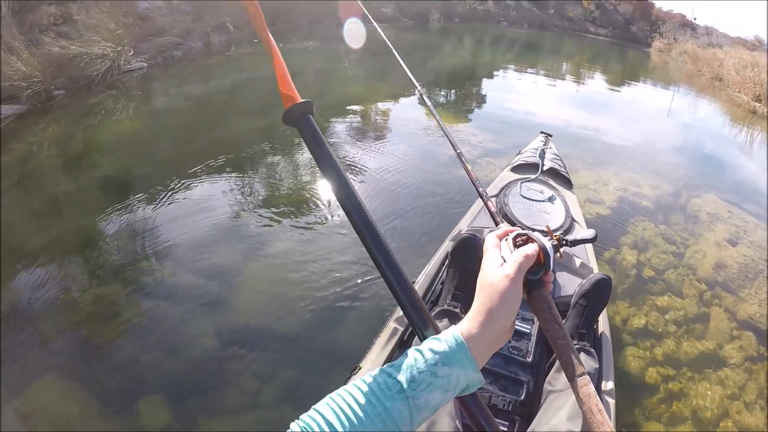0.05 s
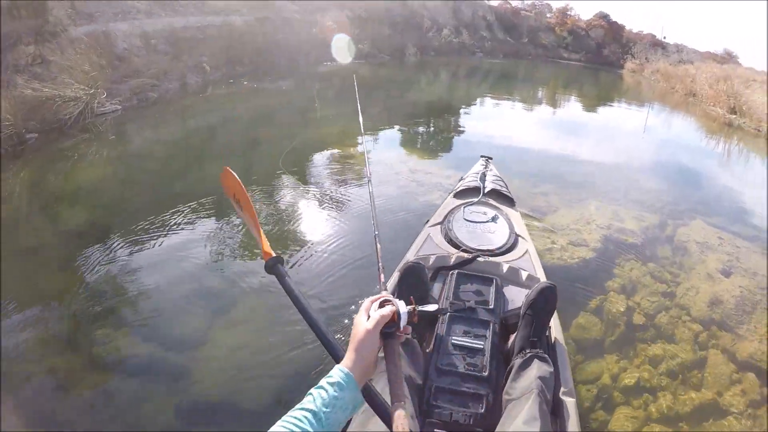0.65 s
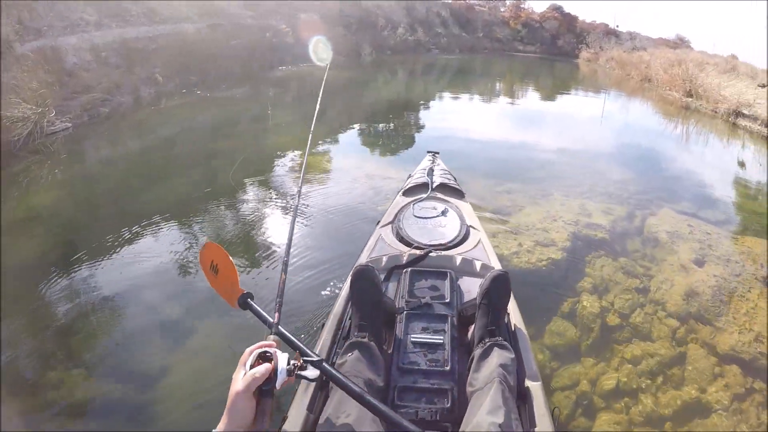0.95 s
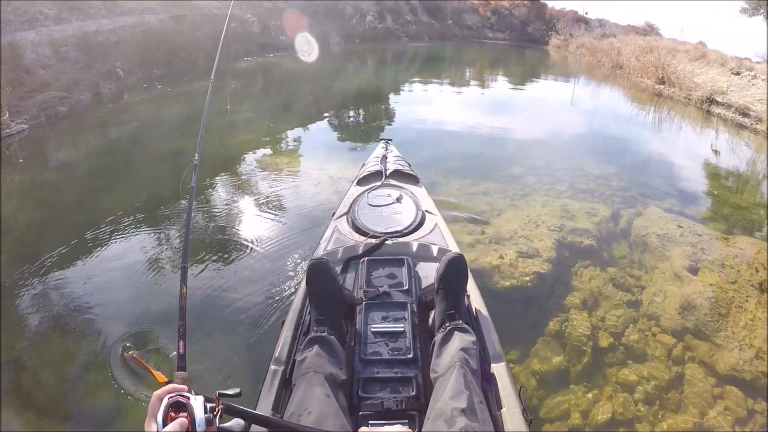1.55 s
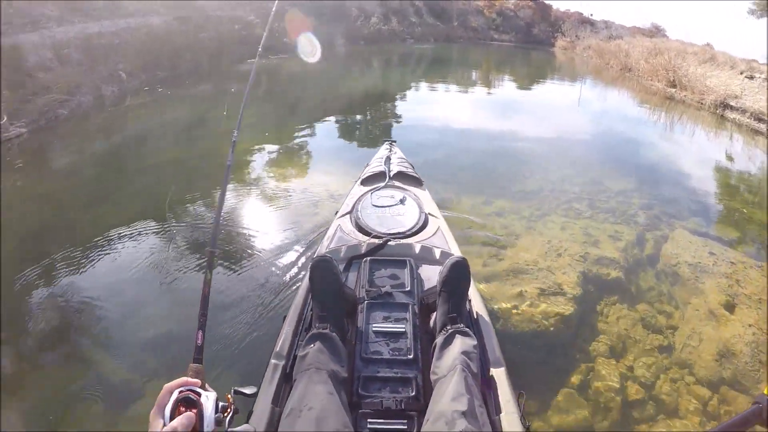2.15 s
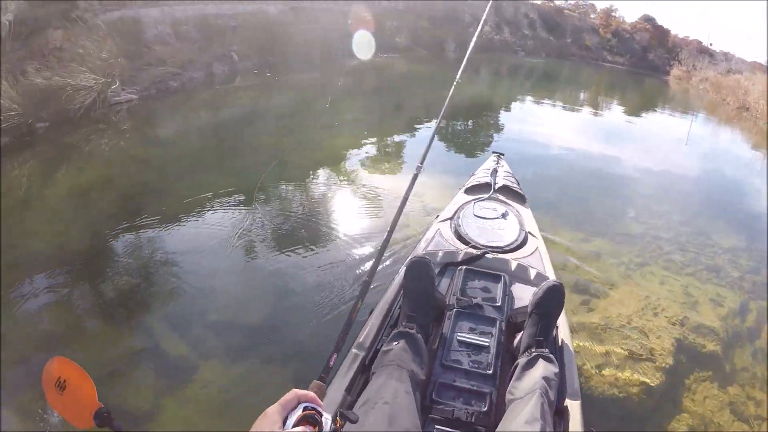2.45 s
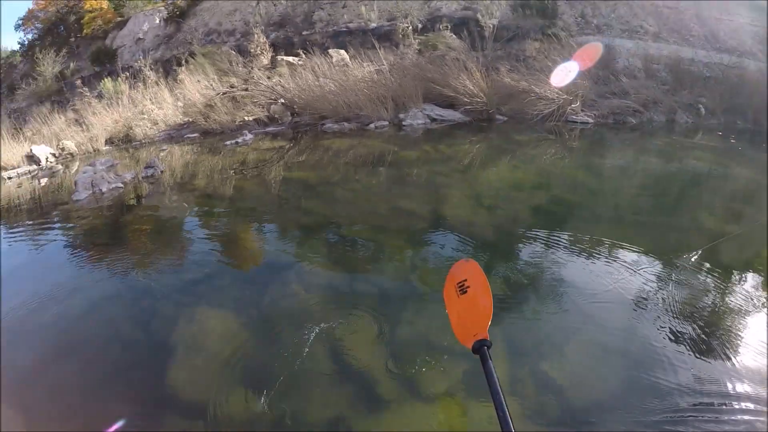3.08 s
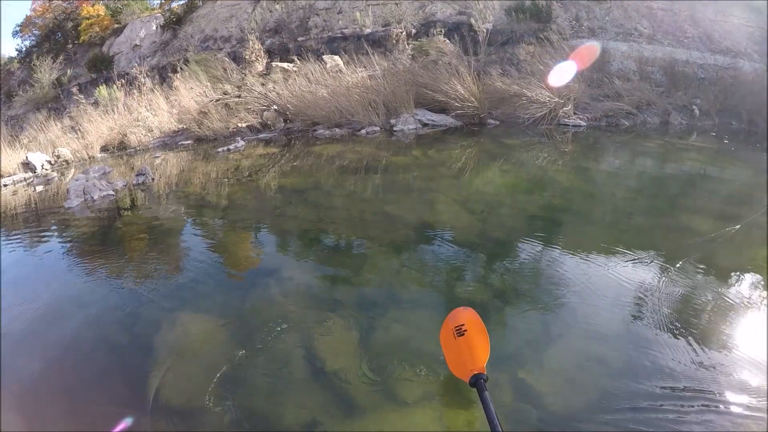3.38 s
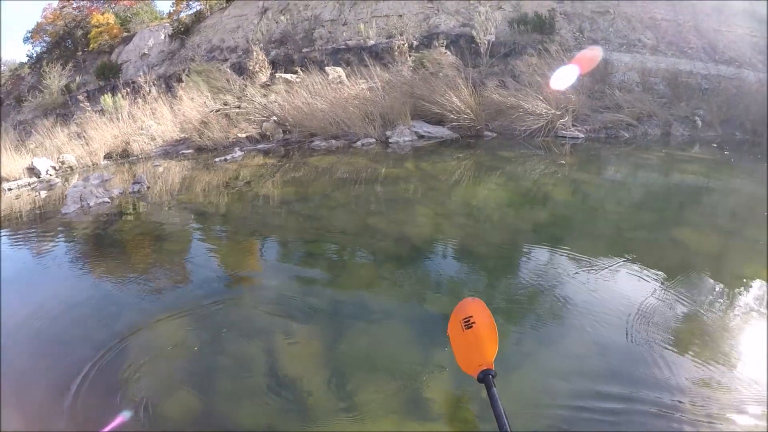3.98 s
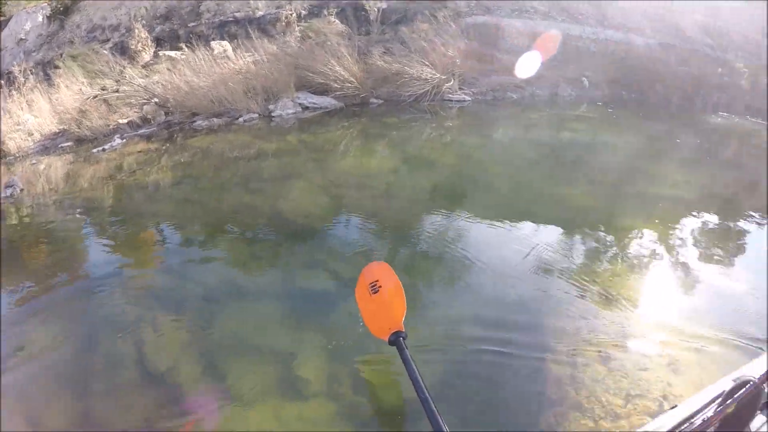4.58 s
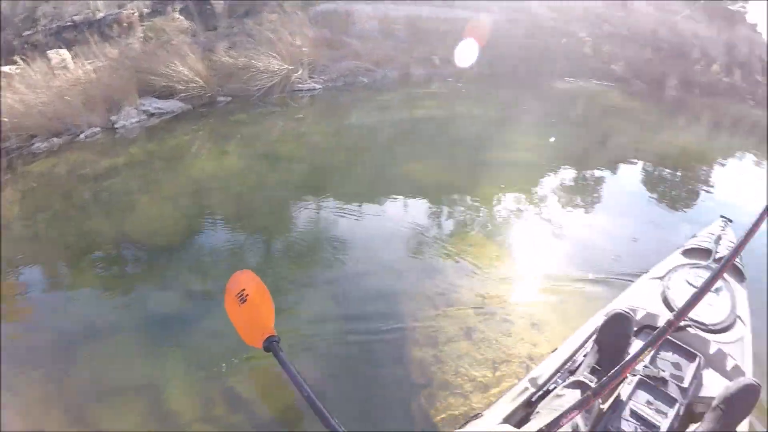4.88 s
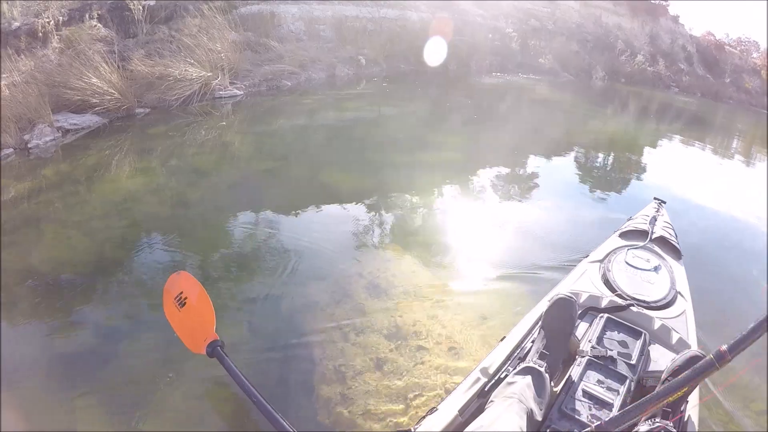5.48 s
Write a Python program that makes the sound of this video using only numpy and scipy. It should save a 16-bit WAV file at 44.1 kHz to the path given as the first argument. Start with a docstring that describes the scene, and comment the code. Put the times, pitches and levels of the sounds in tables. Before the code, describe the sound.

Close to a body-worn microphone on a quiet river, water gurgles softly around a paddle blade in two easy strokes, with drips between them and tiny ticks from a rod and line. Just after the second stroke a fishing reel engages with a single loud, sharp clack and a low puff of air passes. Then come faint cloth rustling and three light, hollow knocks on the kayak, over a soft breeze and faint hiss.

```python
"""A paddle makes two gentle strokes in a calm river: its blade splashes, folds under air pockets that
resonate as bubbles, and drips. An angler's tackle ticks, and the reel snaps into gear with one sharp
clack, an impact that excites the modes of frame and rod. A sleeve rustles by friction and gear bumps
the hollow plastic kayak. A light breeze, a faint whirr and a thin hiss lie underneath.
All is heard at the two microphone ports of a camera worn on the body."""
import sys
import numpy as np
from scipy import signal
from scipy.fft import rfft, irfft, next_fast_len
from scipy.io import wavfile
from scipy.ndimage import map_coordinates

SR = 44100
rng = np.random.default_rng(int(sys.argv[2]) if len(sys.argv) > 2 else 0)


def persist_wave(psi):
    """Save psi, clipped to +-1, as 16-bit WAV."""
    counts = np.round(np.clip(psi, -1, 1) * 32767).astype(np.int16)
    wavfile.write(sys.argv[1], SR, np.atleast_2d(counts).T)


N = 243873
TOP_HZ = 15300

# Levels are relative; pan is left minus right; t60 is the time to decay by 60 dB.
# stereo width, as side over mid: f/Hz, level/dB
WIDTH = [(100, 3), (200, 0.5), (380, 2), (700, 7.5), (1300, 5.5), (2400, -1.5), (4400, -3.5), (8000, 2.5),
         (15000, -1.5)]
# spectrum of breeze and distant water: f/Hz, level/dB
BREEZE_SPECTRUM = [(25, -21.5), (90, -27.5), (115, -23.5), (150, 1.5), (200, 0.5), (300, -4), (500, -10),
                   (1000, -16), (2000, -20), (4000, -25), (8000, -43.5)]
# spectrum of the hiss: f/Hz, level/dB
HISS_SPECTRUM = [(500, -41.5), (2000, -4), (4300, -5), (5800, 4.5), (7700, 4), (8600, 2.5), (10300, 1.5),
                 (11300, -4.5), (15000, -14)]
# water surging round blade and hull: crest t/s, level/dB, rise/s, fall/s, pan/dB
SURGES = [(0.08, -47, 0.11, 0.86, -5.5), (0.62, -39, 0.34, 0.23, -8), (1.4, -50.5, 0.43, 1, -3.5),
          (2.35, -43, 0.44, 0.27, 1), (3.1, -44, 0.12, 0.12, -4), (4.1, -55, 0.81, 3.5, -1)]
# spectrum of churned water: f/Hz, level/dB
WASH_SPECTRUM = [(150, -59), (280, 3.5), (430, 3), (700, -2.5), (1300, 1), (2000, -14.5), (3000, -10.5),
                 (6000, -33), (12000, -50)]
# contacts of line, reel and rod, plus two drops off the blade (0.0465 s, 0.9563 s) sounding as ticks: t/s,
# level/dB, f/Hz, pan/dB, snap over ring/dB
TICKS = [(0.0128, -37, 3670, -13, -5), (0.0465, -36.5, 2900, -15, -7), (0.0652, -38, 6130, -12, -5),
         (0.082, -35, 7500, -5, -0.5), (0.634, -34, 6300, -16, -10), (0.6448, -31.5, 7700, -10, -6),
         (0.8225, -45.5, 3870, -16, 8.5), (0.8265, -40, 7800, -10, 1), (0.8508, -43, 7500, -7, -1),
         (0.8647, -37, 7040, -11, 0.5), (0.8925, -30.5, 7200, -13, -2), (0.896, -30, 7600, -9, -10),
         (0.9367, -35.5, 8050, -9, -9), (0.9563, -35.5, 2750, -11, -1), (1.329, -46, 4020, 0, -6),
         (2.5577, -32, 6300, 4, -9), (2.587, -21.5, 7100, 3, -15), (2.5901, -36, 7500, 3, -12),
         (2.736, -30.5, 6600, 0, -3), (2.776, -30.5, 7400, 0, -10), (2.8905, -37, 3380, 0, 0),
         (3.0615, -31, 7100, 0, -10), (3.108, -32.5, 6800, 1, -8), (3.5595, -35, 6600, -3, -6),
         (4.2566, -37.5, 6900, 0, -14), (4.2825, -41, 4500, -1, 2), (5.334, -38.5, 7050, -11, -7)]
# spectrum of a tick's snap: f/Hz, level/dB
SNAP_SPECTRUM = [(1000, -8), (3000, 0), (7000, 3), (10000, 0), (15000, -13)]
# spectrum of the deck's echo: f/Hz, level/dB
ECHO_SPECTRUM = [(150, -33), (550, 3), (2000, -2), (3200, 1), (5800, -2.5), (7200, -3.5), (9000, -9),
                 (14000, -27)]
# the largest air pockets: t/s, level/dB, f/Hz, pan/dB, ringing/cycles
AIR_POCKETS = [(0.07, -30, 1120, -9, 9.3), (0.278, -35, 492, -1, 13), (0.304, -31, 1500, -10, 30),
               (0.3132, -28, 1150, -9, 11), (0.317, -31, 1430, -8, 55), (0.324, -34, 1250, -8, 16),
               (0.33, -31, 1027, -8.5, 21), (0.407, -35, 407, 6, 26), (0.428, -41, 372, 5, 36),
               (0.465, -46, 365, 3, 24), (0.541, -36, 388, 0, 27), (0.558, -33, 470, -3, 32),
               (0.568, -40, 900, -6, 27), (0.599, -40, 918, -6, 70), (0.583, -32.5, 426, 7, 17),
               (0.5915, -26, 531, -6, 16), (0.633, -25.5, 1900, -9, 17), (0.643, -28, 1880, -8, 48),
               (0.655, -35, 950, -6, 20), (0.669, -36.5, 435, 1, 39), (0.684, -35.5, 409, 7, 42),
               (0.703, -36.5, 604, -4, 19), (0.747, -37, 704, -8, 10), (0.762, -33, 575, 0, 22),
               (0.822, -41.5, 392, 6, 24), (0.851, -45, 1090, -5, 22), (0.876, -38, 1540, -6, 41),
               (0.894, -43, 923, -5, 12), (0.912, -45.5, 663, -3.5, 98), (1.031, -44.5, 359, 0, 20),
               (1.325, -40.5, 397, -1, 7.5), (1.356, -42, 506, 4, 12), (1.385, -45, 953, -7, 16),
               (1.73, -40.5, 692, 0, 8.2), (1.783, -43, 476, -2, 11), (2.14, -42, 367, 2, 34),
               (2.269, -34.5, 432, 3, 47), (2.283, -37, 774, 2, 16), (2.297, -35, 390, 6, 19),
               (2.309, -38, 1350, 11, 19), (2.335, -39, 840, 5, 18), (2.375, -36.5, 1000, 4, 24),
               (2.411, -40.5, 630, -4, 12), (2.451, -42, 680, 0, 12), (2.488, -34, 1260, 10, 16),
               (2.548, -39, 1370, 0, 26), (2.561, -39.5, 1780, 5, 28), (2.585, -44, 1127, 1, 80),
               (2.652, -35.5, 670, -2, 8), (2.684, -40, 1250, 4, 28), (2.73, -40.5, 613, 4, 27),
               (2.767, -34, 1740, 8, 20), (2.775, -38, 1500, 3, 26), (2.822, -41, 1090, 6, 34),
               (2.904, -31.5, 1520, 0, 27), (3.115, -35.5, 1070, -20, 10)]
# the blade enters, turns or lifts out: t/s, level/dB, f/Hz, swell/s, t60/s, pan/dB
SPLASHES = [(0.258, -40.5, 1760, 0.0057, 0.13, -11), (0.284, -32, 1100, 0.025, 0.21, -10),
            (0.312, -35.5, 1250, 0.012, 0.1, -9), (0.484, -44, 1300, .003, 0.092, -10),
            (0.643, -34, 2100, .0014, 0.051, -5), (0.755, -42.5, 900, 0.0055, 0.15, -6),
            (0.821, -35.5, 1310, .002, 0.057, -9), (2.13, -42, 1000, 0.0078, .16, -1),
            (2.268, -38, 750, .007, 0.21, 4), (2.445, -40, 1010, .005, 0.2, 3),
            (2.474, -36, 1260, 0.0083, 0.16, 2), (2.729, -27.5, 1090, .001, 0.023, 10),
            (2.812, -43.5, 1450, 0.0036, 0.12, 10)]
# arm moves that rub the sleeve: crest t/s, level/dB, rise/s, fall/s
ARM_MOVES = [(0.52, -51.5, 0.18, 0.45), (0.93, -53.5, 0.25, 0.067), (2.5, -55.5, 0.6, 0.56),
             (2.85, -49.5, 0.18, 0.28), (3.0, -45.5, 0.016, 0.11), (3.23, -45.5, 0.018, 0.035),
             (3.34, -47, 0.024, 0.039), (3.52, -58.5, 0.12, 0.78), (3.97, -48.5, 0.044, 0.11),
             (4.06, -46.5, 0.016, 0.089), (4.6, -50.5, 0.25, 0.34)]
# spectrum of sliding cloth: f/Hz, level/dB
CLOTH_SPECTRUM = [(200, -14), (500, -0.5), (1200, -3.5), (2500, -1.5), (4200, -1), (6000, 1.5), (7600, 3),
                  (8600, -4.5), (11000, -12), (15000, -25)]
# swell of the whirr: crest t/s, level/dB, rise/s, fall/s
WHIRR_SWELL = (1.1, -56, 0.5, 0.8)
# resonances of the whirr: f/Hz, width/Hz, level/dB
WHIRR_PEAKS = [(924, 53, -4), (1137, 63, -4.5)]
# drops off the raised blade: t/s, level/dB, f/Hz, pan/dB
DRIPS = [(1.434, -41, 3200, -1), (1.5515, -40, 4430, 11), (1.604, -45, 2450, 5), (1.667, -38.5, 2400, 3),
         (1.731, -36, 3160, 2), (1.76, -42, 2800, 6), (1.771, -39, 2050, 6), (1.803, -42, 2470, 0.5),
         (1.875, -29.5, 1330, -20), (1.9663, -34.5, 1560, -11), (2.0767, -33.5, 1790, -9),
         (2.364, -40, 2150, 6), (2.7, -40, 1900, 6)]
# spectrum of a drop's slap: f/Hz, level/dB
SLAP_SPECTRUM = [(300, -14), (1000, -3), (2300, 3), (4000, -7), (7000, -9), (13000, -26)]
# air across the ports as the body turns: crest t/s, level/dB, rise/s, fall/s
GUST = (3, -48, 0.65, 0.35)
# the clutch strikes and rebounds: t/s, level/dB
CLUTCH_STRIKES = [(2.928, 11), (2.9303, -5)]
# modes of the reel's frame: f/Hz, level/dB, t60/s, pan/dB
FRAME_MODES = [(4010, -18.5, 0.0075, -2), (4980, -13.5, 0.006, -6), (5830, -3.5, 0.0044, 3),
               (7140, -4, 0.0035, 8), (8130, -17, .005, 10), (8700, -21, 0.009, -2),
               (10240, -21.5, 0.0073, 9), (10860, -20.5, 0.0067, 5), (12630, -15.5, 0.0028, 11)]
# ping of the clutch spring: f/Hz, level/dB, t60/s
SPRING_MODE = (8265, -38, .085)
# modes of rod and grip: f/Hz, level/dB, t60/s
ROD_MODES = [(530, -29.5, 0.015), (693, -18, 0.01), (1010, -19, 0.0071), (1240, -16.5, 0.0076),
             (1580, -18.5, 0.01), (1844, -20.5, 0.01), (2200, -44, 0.0058), (2850, -24.5, 0.0099)]
# the grip thuds back once: t/s, f/Hz, level/dB, t60/s
GRIP_REBOUND = (3, 687, -30.5, 0.026)
# gear against the hull: t/s, level/dB
BUMPS = [(3.501, -34.5), (3.658, -33), (4.403, -28.5)]
# modes of the hull: f/Hz, level/dB, t60/s
HULL_MODES = [(161.5, -6, 0.14), (235, -4.5, 0.042), (400, -6.5, 0.024), (1150, -7, 0.015),
              (1860, 0, 0.012)]
# spectrum of a brief contact with the hull: f/Hz, level/dB
CRACK_SPECTRUM = [(200, -9), (900, -2), (2500, -2.5), (4500, -7), (6800, 1), (8500, -18), (13000, -41)]


def amp(db):
    return 10 ** (np.asarray(db) / 20)


def unit(x):
    return x / np.sqrt(np.mean(x ** 2) + 1e-20)


def gain(points, hz):
    """Interpolation of (f/Hz, level/dB) points on a log axis, as an amplitude gain."""
    f, db = np.transpose(points)
    return amp(np.interp(np.log(hz + 1), np.log(f + 1), db))


def wobble(rate):
    """Random modulation: a smooth curve with rate knots a second."""
    knots = rng.standard_normal(int(N * rate / SR) + 4)
    return map_coordinates(knots, [np.arange(N) * rate / SR])


def filtered(x, response):
    """Linear filtering: the spectrum of x times a frequency response."""
    size = x.shape[-1]
    padded = next_fast_len(size + 8192)
    return irfft(rfft(x, padded) * response(np.fft.rfftfreq(padded, 1 / SR)), padded)[..., :size]


def panned(pan_db):
    """Constant-power law for the left and right gains."""
    gains = amp(np.array([pan_db, -pan_db]).reshape(2, -1) / 2)
    return gains / np.sqrt(np.mean(gains ** 2, axis=0))


def diffuse(pair, spectrum):
    """Partial coherence: two unrelated signals, as mid and side, give coloured stereo of rms 1."""
    mid, side = filtered(pair, lambda hz: gain(spectrum, hz) * np.array([np.ones_like(hz), gain(WIDTH, hz)]))
    return unit(np.array([mid + side, mid - side]))


def noise(spectrum, size=N):
    """Spectrally shaped stereo noise of rms 1."""
    return diffuse(rng.standard_normal((2, size)), spectrum)


def add(track, s, sound):
    """Superposition of a short stereo sound at time s."""
    start = int(np.clip(round(s * SR), 0, N))
    part = sound[:, :N - start]
    track[:, start:start + part.shape[1]] += part


def fade(t, attack, t60):
    """Exponential damping after a soft onset."""
    return (1 - np.exp(-t / attack)) * amp(-60 * t / t60)


def surge(crest_s, db, rise_s, fall_s):
    """Envelope of a movement: Gaussian rise to the crest, then exponential decay."""
    t = np.arange(N) / SR - crest_s
    return amp(db) * np.exp(-np.where(t < 0, (t / rise_s) ** 2, t / fall_s))


def ring(modes, t, attack, spread):
    """Free vibration of damped modes; the phase of each at each port scatters by spread radians."""
    return sum(amp(db) * fade(t, attack, t60)
               * np.sin(2 * np.pi * hz * t + spread * rng.standard_normal((2, 1)))
               for hz, db, t60 in modes)


def low_cut(x, corner_hz=130):
    """High-pass: the camera's low cut takes deep bass from knocks and splashes; the clack is cut higher."""
    return signal.sosfilt(signal.butter(4, corner_hz, "highpass", fs=SR, output="sos"), x)


def breeze(level_db=-49, waver_db=1.3):
    """Flow noise of breeze and distant water, wavering slightly in level."""
    return amp(level_db + waver_db * wobble(9)) * noise(BREEZE_SPECTRUM)


def hiss(level_db=-59.5):
    """Stationary noise, strongest in the treble."""
    return amp(level_db) * noise(HISS_SPECTRUM)


def bubble(hz, cycles, glide, lag_s, swell_cycles=1, waver=0.048):
    """Bubble resonance: trapped air rings, wavering as it deforms and gliding as its depth changes."""
    life = cycles / hz
    t = np.arange(int(life * SR) + 2) / SR
    deform = np.interp(t, np.linspace(0, life, 10), rng.standard_normal(size=10))
    phase = 2 * np.pi * hz * np.cumsum(1 + glide * t / life + waver * deform) / SR
    port_phase = min(2 * np.pi * hz * lag_s, 2.3) * np.array([[-.5], [.5]])
    envelope = fade(t, swell_cycles / hz, life)
    return envelope / envelope.max() * np.sin(phase + port_phase)


def fizz(low_hz, octaves, treble_db, range_db, cycles, count):
    """Incoherent sum of bubbles, of rms 1; the smallest ring highest and are lifted by treble_db."""
    out = np.zeros((2, N))
    for when, pitch, strength, glide in rng.uniform(size=(count, 4)):
        note = bubble(low_hz * 2 ** (octaves * pitch), cycles, 0.3 * glide, lag_s=0.00063)
        add(out, when * N / SR, amp(range_db * strength + treble_db * pitch) * note)
    return unit(out)


def churn(bubbles_db=-5.5, spray_db=-19, wash_db=-7):
    """Air entrainment: small bubbles, fine spray and a soft wash follow the surges of the water."""
    flow = np.sqrt(sum((panned(pan_db) * surge(*swell)) ** 2 for *swell, pan_db in SURGES))
    bubbles = fizz(low_hz=397.2, octaves=2.48, treble_db=3, range_db=15.5, cycles=24, count=1500)
    spray = fizz(low_hz=2200, octaves=1.67, treble_db=5, range_db=6, cycles=12, count=800)
    wash = unit(noise(WASH_SPECTRUM) * amp(4.8 * wobble(150)))
    return flow * (amp(bubbles_db) * bubbles + amp(spray_db) * spray + amp(wash_db) * wash)


def tick(hz, snap_db=-9, cycles=15):
    """Impulse excitation: a tiny hard contact snaps, and a small part rings for a few cycles."""
    t = np.arange(SR // 40) / SR
    tone = ring([(hz, 0, cycles / hz)], t, attack=0.00038, spread=1.0)
    snap = noise(SNAP_SPECTRUM, size=len(t)) * fade(t, attack=0.0001, t60=0.0068)
    return tone / np.abs(tone).max() + amp(snap_db) * snap


def tackle(faint_db=-45, range_db=6, faint_hz=6800, count=36):
    """Light impacts: clear ticks of the handled tackle and of two early drops off the blade, with faint ticks
    at random in between."""
    out = np.zeros((2, N))
    for s, db, hz, pan_db, snap_db in TICKS:
        add(out, s, amp(db) * panned(pan_db) * tick(hz, snap_db))
    for when, strength, pitch in rng.uniform(size=(count, 3)):
        hz = faint_hz * 2 ** (.4 * (pitch - .5))
        add(out, when * N / SR, amp(faint_db + range_db * (strength - 1)) * tick(hz))
    return out


def deck_echo(x, level_db=-11.5, t60=0.059):
    """Scattering from hull, legs and water adds a tail of a few hundredths of a second."""
    t = np.arange(SR // 8) / SR
    tail = noise(ECHO_SPECTRUM, size=len(t)) * fade(t, 0.0011, t60)
    tail /= np.linalg.norm(tail, axis=1, keepdims=True)
    return amp(level_db) * signal.fftconvolve(x, tail, axes=1)[:, :N]


def plops(level_db=-1, glide=0.045, glide_spread=0.094):
    """Volume oscillation of the larger air pockets that the blade folds under."""
    out = np.zeros((2, N))
    for s, db, hz, pan_db, cycles in AIR_POCKETS:
        note = bubble(hz, cycles, rng.normal(glide, glide_spread), lag_s=0.00034, swell_cycles=1.4)
        add(out, s, amp(db + level_db) * panned(pan_db) * note)
    return out


def splashes(level_db=-1, spatter_db=4):
    """Modulated band noise: water spatters unevenly off the blade, swells and drains away."""
    out, t = np.zeros((2, N)), np.arange(SR // 5) / SR
    for s, db, hz, swell, t60, pan_db in SPLASHES:
        band = [(hz / 4, -18), (hz, -1), (hz * 1.23, 0), (hz * 2, -10), (hz * 4, -24), (hz * 12, -45)]
        burst = noise(band, size=len(t)) * fade(t, swell, t60)
        add(out, s, amp(db + level_db) * panned(pan_db) * burst)
    return out * unit(amp(spatter_db * wobble(220)))


def sleeve(level_db=-1, grain_db=2.0, catch_db=2.13):
    """Stick-slip friction: cloth catches and lets go countless times with each move of the arm."""
    rub = np.sqrt(sum(surge(*move) ** 2 for move in ARM_MOVES))
    slips = rng.standard_normal((2, N)) * amp(grain_db * wobble(700) + catch_db * wobble(70))
    return amp(level_db) * rub * diffuse(slips, CLOTH_SPECTRUM)


def whirr():
    """Resonant filtering: noise in two narrow peaks is a faint hollow whirr between the strokes."""
    def peaks(f):
        return sum(amp(db) / (1 + (2 * (f - hz) / width) ** 2) for hz, width, db in WHIRR_PEAKS)
    return surge(*WHIRR_SWELL) * unit(filtered(noise(WASH_SPECTRUM), peaks))


def drips(level_db=-1, slap_db=-9, droplet_db=-14, cycles=26, glide=-0.075, lag_s=.0004,
          scatter_s=0.014, scatter_octaves=0.64, droplets=3):
    """Drop impact: a slap leaves a bubble whose note sinks with it; droplets fall back around it."""
    out, t = np.zeros((2, N)), np.arange(SR // 30) / SR
    for s, db, hz, pan_db in DRIPS:
        strength = amp(db + level_db) * panned(pan_db)
        slap = noise(SLAP_SPECTRUM, size=len(t)) * fade(t, attack=0.00016, t60=0.011)
        add(out, s, strength * amp(slap_db) * slap)
        add(out, s, strength * bubble(hz, cycles, glide, lag_s, swell_cycles=0.59))
        for when, pitch in rng.uniform(size=(droplets, 2)):
            droplet = bubble(hz * 2 ** (scatter_octaves * (2 * pitch - 1)), cycles / 2, glide, lag_s)
            add(out, s + scatter_s * when, strength * amp(droplet_db) * droplet)
    return out


def gust():
    """Turbulence: one low puff of air crosses the microphone."""
    spectrum = [(30, -3), (100, -24), (150, 11), (300, 0.5), (700, -1.5), (2000, -7.5), (6000, -49)]
    return surge(*GUST) * noise(spectrum)


def reel_clack(port_lag_s=-0.000035, rod_delay_s=0.00111, rod_pan_db=-6, echo_db=-28.5):
    """Modal ringing: the clutch shocks frame, spring and rod; the grip thuds back, the deck echoes."""
    out, t = np.zeros((2, N)), np.arange(SR // 8) / SR
    port_t = t + port_lag_s * np.array([[.5], [-.5]])
    frame = sum((-1) ** k * amp(db) * panned(pan_db)  # successive modes alternate in sign
                * fade(t, 0.00061, t60) * np.sin(2 * np.pi * hz * port_t)
                for k, (hz, db, t60, pan_db) in enumerate(FRAME_MODES))
    for s, db in CLUTCH_STRIKES:
        add(out, s, amp(db) * frame)
    strike_s = CLUTCH_STRIKES[0][0]
    add(out, strike_s, ring([SPRING_MODE], t, attack=.0003, spread=0.39))
    rod = ring(ROD_MODES, t, attack=0.00036, spread=0.8)
    add(out, strike_s + rod_delay_s, panned(rod_pan_db) * rod)
    rebound_s, *thud = GRIP_REBOUND
    add(out, rebound_s, ring([thud], t, attack=.0005, spread=0.5))
    echo = noise(ECHO_SPECTRUM, size=len(t)) * fade(t, attack=0.00015, t60=0.087)
    add(out, strike_s + rod_delay_s, amp(echo_db) * echo)
    return low_cut(out, corner_hz=290)


def hull_bumps(hardness=1.3, crack_db=-11):
    """Shell vibration: gear knocks the hull; weaker, softer blows give less crack and upper modes."""
    out, t = np.zeros((2, N)), np.arange(SR // 4) / SR
    loudest_db = max(db for s, db in BUMPS)
    lowest_hz = HULL_MODES[0][0]
    for s, db in BUMPS:
        soft_db = hardness * (db - loudest_db)
        modes = [(hz, level + soft_db * np.log10(hz / lowest_hz), t60) for hz, level, t60 in HULL_MODES]
        crack = noise(CRACK_SPECTRUM, size=len(t)) * fade(t, attack=0.00035, t60=0.048)
        shell = ring(modes, t, attack=0.0012, spread=0.49)
        add(out, s, amp(db) * (shell + amp(crack_db + soft_db) * crack))
    return low_cut(out)


def scene():
    """Superposition of water and gear close by, over the quiet of the river."""
    near = low_cut(plops() + drips() + tackle() + splashes())
    kayak = near + deck_echo(near) + churn() + whirr() + reel_clack() + hull_bumps() + sleeve()
    return kayak + breeze() + gust() + hiss()


def record(dry):
    """Saturation and band limit: the camera stops at full scale and keeps nothing above TOP_HZ."""
    return filtered(np.clip(dry, -1, 1), lambda hz: hz < TOP_HZ)


dry = scene()
out = record(dry)
persist_wave(out)
```